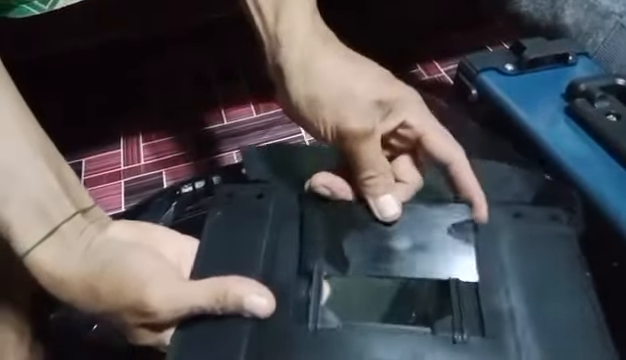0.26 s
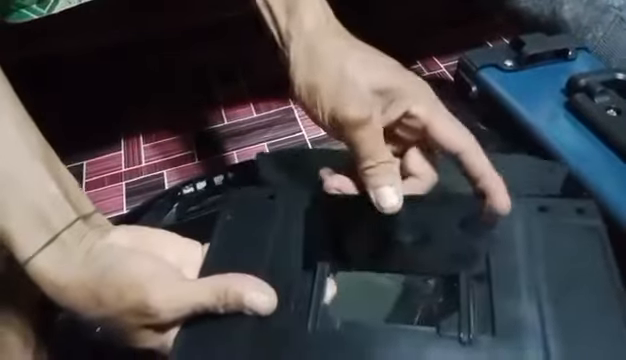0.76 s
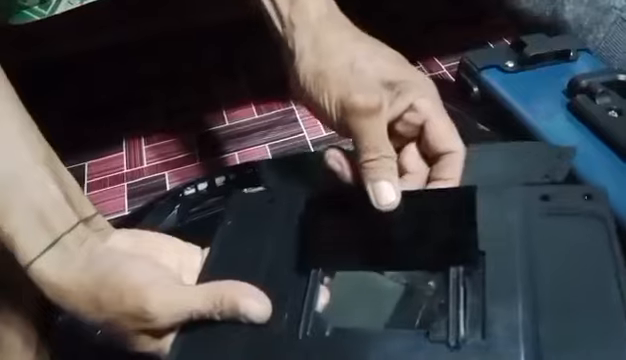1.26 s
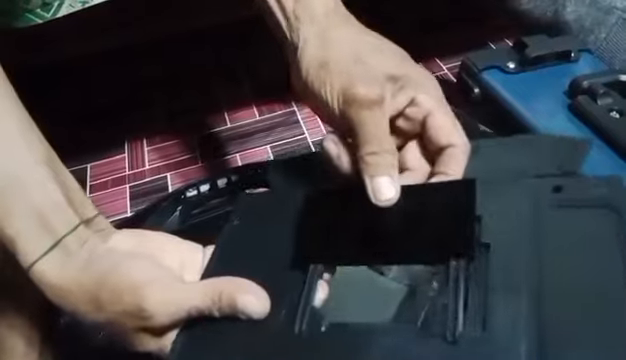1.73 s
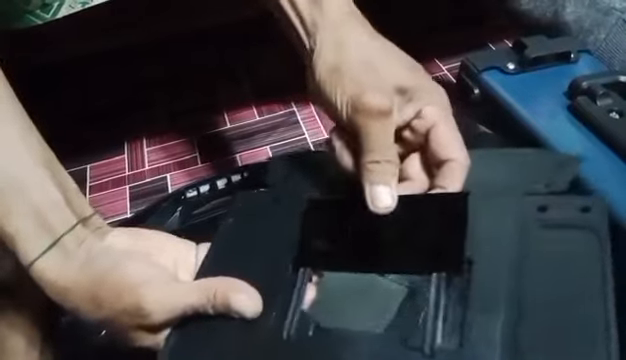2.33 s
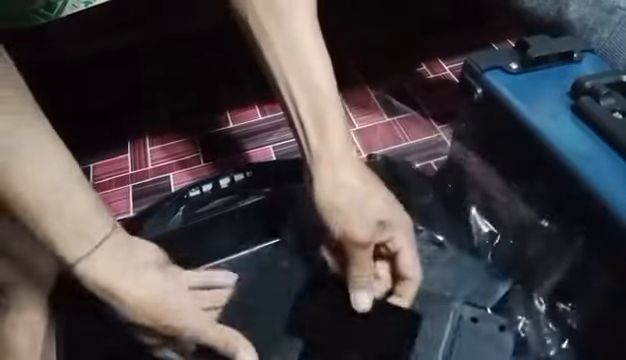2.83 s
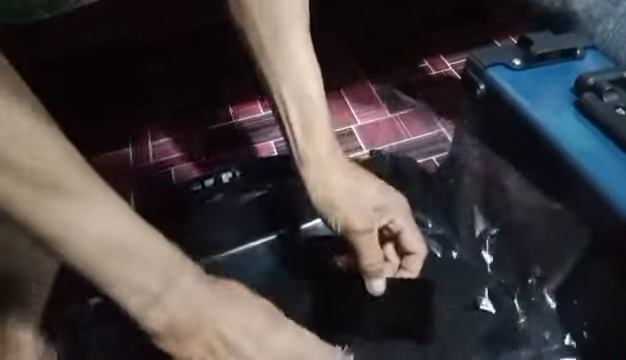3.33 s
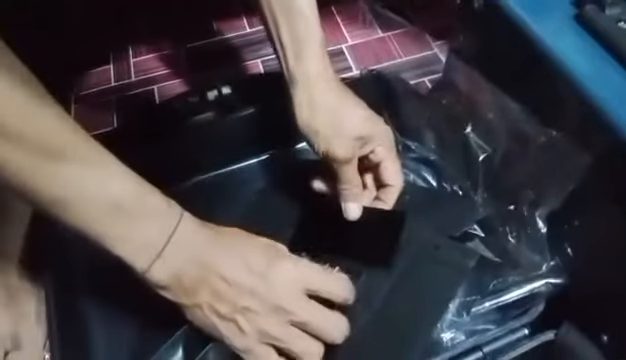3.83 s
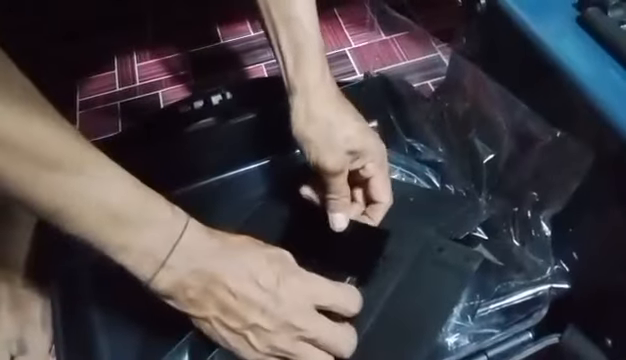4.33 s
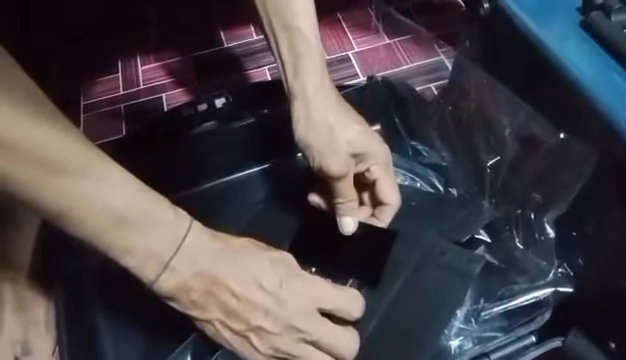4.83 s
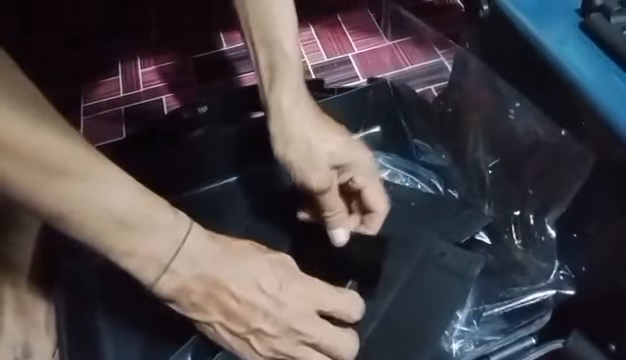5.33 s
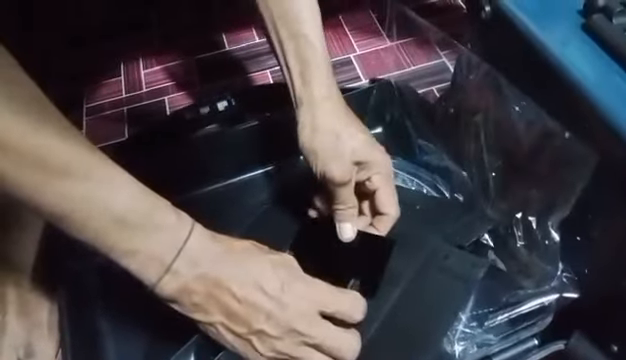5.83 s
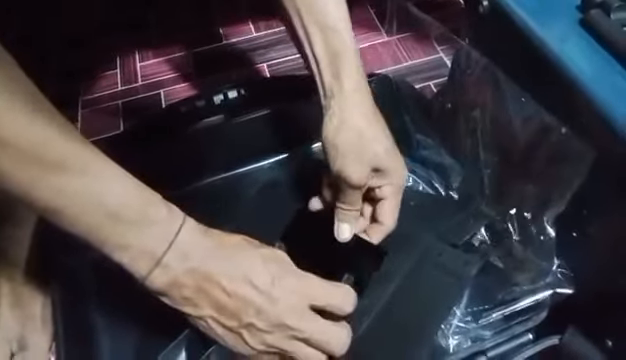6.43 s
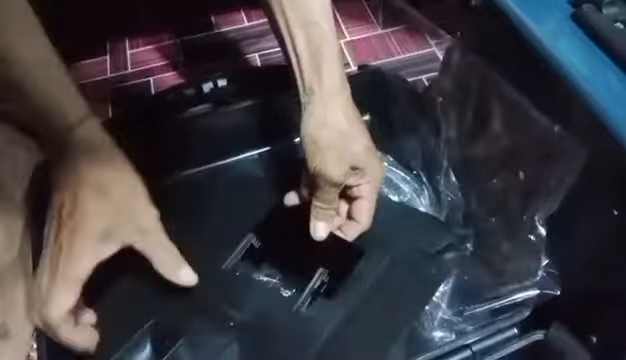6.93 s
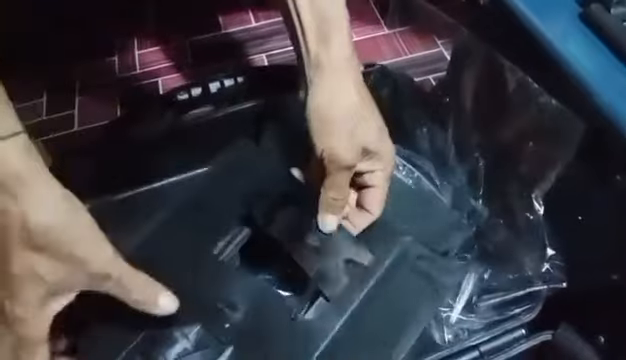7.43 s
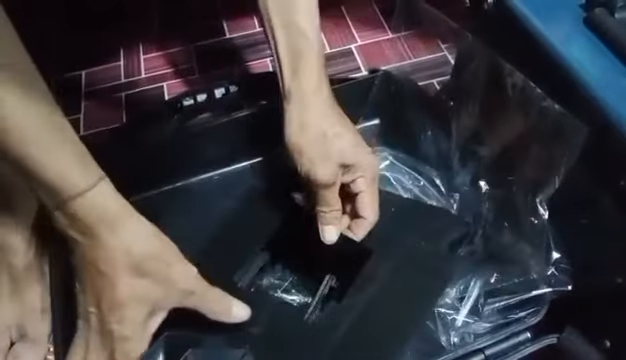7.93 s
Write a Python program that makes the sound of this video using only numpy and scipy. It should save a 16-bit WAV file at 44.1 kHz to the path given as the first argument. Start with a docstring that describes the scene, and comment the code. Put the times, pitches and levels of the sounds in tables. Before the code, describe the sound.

Close, detailed handling of plastic in a small room with a short diffuse echo, faint steady hiss and distant wavering low rumble. From 0 to 0.9 s, light film crinkles and a few brittle snaps. Sharp, bright clicks at about 1.2 and 2.2 s stand apart in near quiet, with a weaker one at 2.0. At 2.55-3.35 s the shell is moved: a dense flurry of crackling wrap, a heavy hollow clunk near 2.6, short scraping, and more snaps around 3.25. From 3.5 to 6.3 s the film settles in soft fine crackle, while small parts click and knock hollowly, clearest at 4.45, 4.85, 5.2 and 5.3. Around 6.4-6.7 s comes another crisp crinkling burst with strong snaps. A hollow knock, brief drag and faint rising creak follow near 7.0-7.2, another faint creak at 7.4, light knocks at 7.6-7.7, then a small rustle at 8.1.

```python
"""A small room: hands fit a glass filter into a plastic face shield that lies on clear wrapping, heard close up.
The film crinkles from filtered random clicks and snaps in short noise bursts.
The shell is knocked (decaying modes), dragged (slips through resonances) and creaks (gliding tones).
A short diffuse echo follows the hits; a faint hiss and a distant rumble of filtered noise fill the room."""
import sys
import numpy as np
from scipy import signal
from scipy.fft import rfft, irfft
from scipy.io import wavfile
from scipy.ndimage import uniform_filter1d

SR = 44100
rng = np.random.default_rng(int(sys.argv[2]) if len(sys.argv) > 2 else 0)


def output_pcm(signal):
    """Save a mono or channel-first signal as 16-bit PCM at the path in sys.argv[1].

    Samples are clipped to [-1, 1] before scaling.
    """
    pcm = np.clip(np.atleast_2d(signal).T, -1, 1) * 32767
    wavfile.write(sys.argv[1], SR, np.round(pcm).astype(np.int16))


N = 359856  # length in samples


def undb(db):
    """Amplitude factor of a level in dB."""
    return 10 ** (np.asarray(db) / 20)


def unit(x):
    """Scale to an RMS of 1."""
    return x / np.sqrt(np.mean(x ** 2))


def peak_unit(x):
    """Scale to a peak of 1."""
    return x / np.abs(x).max()


def curve(rows):
    """Columns of a breakpoint table, joined by straight lines sample by sample."""
    s, *columns = np.transpose(rows)
    return [np.interp(np.arange(N) / SR, s, c) for c in columns]


def colour(x, points, size=2048):
    """Causal minimum-phase filter through (f/Hz, gain/dB) points, made from the cepstrum."""
    hz, db = np.transpose(points)
    grid = np.maximum(np.fft.rfftfreq(size, 1 / SR), 1)
    log_gain = np.log(undb(np.interp(np.log(grid), np.log(hz), db)))
    cepstrum = irfft(log_gain)
    cepstrum[1:size // 2] *= 2  # fold onto positive time: no pre-ringing
    impulse = irfft(np.exp(rfft(cepstrum[:size // 2], size)))
    return signal.fftconvolve(x, impulse)[:len(x)]


def resonate(x, peaks):
    """Sum of band-passes (f/Hz, width/Hz, level/dB)."""
    return sum(undb(db) * signal.lfilter(*signal.iirpeak(hz, hz / width, SR), x) for hz, width, db in peaks)


def resonate_twice(x, peaks):
    """The same resonances in series, for steeper skirts."""
    return resonate(resonate(x, peaks), peaks)


def treble(x, hz):
    """Keep what lies above hz."""
    return signal.sosfilt(signal.butter(4, hz, "high", fs=SR, output="sos"), x)


def below(x, hz):
    """Keep what lies below hz."""
    return signal.sosfilt(signal.butter(4, hz, fs=SR, output="sos"), x)


def walk(rate):
    """Random values, a new one every 1 / rate s, joined by straight slopes."""
    k = int(SR / rate)
    return uniform_filter1d(np.repeat(rng.standard_normal(N // k + 1), k), k)[:N]


def grains(rate, spread_db):
    """Random clicks, about rate a second, most small and a few large."""
    happens, sign, size = rng.random((3, N))
    strength = undb(spread_db * np.minimum(-np.log(1 - size), 5))
    return (happens < rate / SR) * np.sign(sign - .5) * strength


def add(track, s, sound):
    """Mix a sound into the track at s seconds."""
    i = int(s * SR)
    track[i:i + len(sound)] += sound[:len(track) - i]


RISE_DB = 50  # climb of a push over its rise time


def swell(s, rise, hold, fall_db_s):
    """Gain that rises to 1 at s, holds and dies away, in straight dB slopes."""
    t = np.arange(N) / SR
    db = -RISE_DB * np.maximum(s - t, 0) / max(rise, .002) - fall_db_s * np.maximum(t - s - hold, 0)
    return undb(np.maximum(db, -200))


# moments when the level dips briefly: from t/s, to t/s
DIPS = [(2.614, 2.626), (2.931, 2.944)]


def dips():
    """1, but 0 in the brief dips, with softened edges."""
    t = np.arange(N) / SR
    return uniform_filter1d(1. - sum((t > a) & (t < b) for a, b in DIPS), size=128)


# tone of the film: f/Hz, gain/dB
FILM = [(1060, 0.5), (2000, -5), (2420, -3), (2980, -5), (4200, -0.5), (4700, 6), (6070, 8), (9260, 0),
        (13000, -6.5)]


def film_voice(x):
    """The film's tone colour, split into a dull part and a thin bright part."""
    full = treble(colour(x, FILM), 1480)
    return below(full, 8500), treble(full, 11640)


# bands of the rubbing film that come and go: f/Hz
SHEEN_HZ = [4900, 5600, 6440, 6960]
# larger folds of the film that ring in patches: f/Hz
FOLDS_HZ = [1390, 1800, 2400, 3310, 3750]
# slow settling of the film under the shell's weight: t/s, relative level/dB
SETTLE = [(0, -42), (1.0, -51.5), (2.5, -45), (3.75, -41), (4.42, -37.5), (5.5, -37.5), (6.35, -47),
          (6.9, -48.5), (7.2, -43), (7.86, -48), (8.16, -41)]
SETTLE_CRISP_DB = -14.5  # crisp share while settling
# bursts of crinkling as the film is pushed:
# t/s of full level, rise/s, hold/s, relative level/dB, crisp share/dB
RUSTLES = [(0.008, 0.039, 0.0059, -37, 2), (0.147, 0.086, 0.27, -43.5, -3.5), (0.58, 0.21, 0.026, -32, 0.5),
           (0.676, 0.07, 0.11, -43, -14), (0.877, 0.04, 0.015, -40, -12.5), (2.551, 0.057, 0.071, -28.5, 1),
           (2.626, 0.03, 0.15, -30.5, -4.5), (2.798, 0.12, 0.064, -36, -5), (2.888, 0.08, 0.023, -30.5, -6),
           (2.937, 0.067, 0.4, -38, -10), (3.308, 0.03, 0.031, -34, -3), (3.51, 0.077, 0.034, -38, -1),
           (6.442, 0.14, 0.032, -28.5, -3), (6.512, 0.065, 0.055, -32.5, -3),
           (6.673, 0.027, .005, -36.5, -8), (6.711, 0.025, 0.015, -33, -5.5), (6.95, 0.22, 0.22, -46, -6),
           (7.182, 0.028, 0.031, -35, -13), (8.098, 0.013, 0.07, -48.5, -6)]
RUSTLE_FALL_DB_S = 249


def crinkle():
    """Dull rubbing plus swarms of sharper buckles that come in bunches; when pushed, larger folds ring in patches."""
    rub, _ = film_voice(grains(6000, 1.8) * undb(1.8 * walk(75)))
    sheen = sum(undb(7 * np.tanh(walk(16))) * resonate(rub, [(hz, 450, 0)]) for hz in SHEEN_HZ)
    rub = unit(rub) + unit(sheen)

    buckles = grains(1000, 2.2) * undb(3.5 * walk(200))
    dull, bright = film_voice(buckles)
    crisp = undb(-16.0) * unit(dull) + unit(bright)
    folds = sum(undb(10 * np.tanh(walk(10))) * resonate_twice(buckles, [(hz, 260, 0)]) for hz in FOLDS_HZ)

    settle_gain = undb(curve(SETTLE)[0])
    crisp_gain = settle_gain * undb(SETTLE_CRISP_DB)
    push_gain = np.zeros(N)
    jerks = undb(4.5 * np.tanh(walk(90)))  # pushed film moves in fits
    for s, rise, hold, db, crisp_db in RUSTLES:
        burst = undb(db) * jerks * swell(s, rise, hold, RUSTLE_FALL_DB_S)
        push_gain = push_gain + burst
        crisp_gain = crisp_gain + undb(crisp_db) * burst
    rubbing = (settle_gain + push_gain) * undb(-4.0) * unit(rub)
    return rubbing + push_gain * undb(-15) * unit(folds) + crisp_gain * crisp


# single creases that snap: t/s, relative level/dB, relative thin bright share/dB
SNAPS = [(0.007, -27, -8), (0.02, -28, -7), (0.157, -21, 2), (0.19, -11.5, 3.5), (0.236, -18, 1),
         (0.3853, -12, 1), (0.517, -23, -1), (0.576, -21.5, 14), (2.539, -25, 5), (2.5874, -5, -3),
         (2.625, -8, 2), (2.708, -11, -15), (2.742, -8, -8), (2.7458, -7.5, -8), (2.7664, -18, 2),
         (2.783, -9, -24), (2.814, -17, -9), (2.858, -13, 0.5), (2.8843, -17, -8), (2.894, -16, -6),
         (2.904, -12, -1), (2.945, -19, 6), (3.072, -16.5, 2), (3.108, -20, -1), (3.217, -27, 14),
         (3.234, -15, 5), (3.252, -6, -10), (3.26, -10, -2), (3.301, -17, 10), (3.306, -16, -3),
         (3.313, -14, -1), (3.323, -10.5, 0), (3.333, -18, 0), (3.8644, -16, 3.5), (3.915, -16, 6),
         (4.807, -8, 1.5), (5.612, -17.5, -5), (6.0436, -19.5, 10.5), (6.363, -19.5, -3),
         (6.4122, -10, 4.5), (6.45, -8.5, -8), (6.46, -4, -9), (6.466, -4, -3), (6.522, -19, 2),
         (6.532, -16, -1), (6.558, -16, -2), (6.5689, -6.5, 1.5), (6.682, -18.5, -11), (6.983, -18, -3),
         (7.114, -15, -30), (7.333, -17.5, -0.5)]
SNAP_S, SNAP_SHORTENS = 0.0011, 0.25  # base decay of a crease; dB shorter per dB of bright share


def snaps():
    """Each crease lets go in a burst of a few milliseconds with a ring of its own; bright ones are the shortest."""
    out, t = np.zeros(N), np.arange(1024) / SR
    for s, db, bright_db in SNAPS:
        u = t / (SNAP_S * undb(-SNAP_SHORTENS * max(bright_db, -6)))
        dull, bright = film_voice(rng.standard_normal(len(t)) * u * np.exp(-u))
        dull = treble(dull, 2500) + resonate(dull, [(rng.choice(SHEEN_HZ), 500, 4.0)])
        crease = peak_unit(dull) + undb(bright_db + 4.0) * peak_unit(bright)
        add(out, s, undb(db - 8.0) * crease)
    return out


def ring(modes, push_s):
    """Modes (f/Hz, level/dB, t60/s) driven by a soft push of push_s, a little different each time; peak 1."""
    t, y = np.arange(3072) / SR, 0
    push = np.sin(np.pi * t[t < push_s] / push_s) ** 2
    for (hz, db, t60), (db_drift, hz_drift, phase) in zip(modes, rng.standard_normal((len(modes), 3))):
        decay = np.convolve(1000 ** (-t / t60), push)[:len(t)]
        mode = np.sin(2 * np.pi * (hz * (1 + .01 * hz_drift) * t + phase)) * decay
        y = y + undb(db + db_drift) * peak_unit(mode)
    return peak_unit(y)


# knocks on glass and shell, levels relative within each column:
# t/s, click level/dB, hollow ring level/dB, hollow pitch f/Hz, thud level/dB, side modes level/dB
KNOCKS = [(0.2108, -24, -33.5, 1270, -33.5, -11), (1.2136, -5, -24, 1346, -39, -9),
          (1.9813, -24.5, -48, 1430, -35, -17), (2.1961, -6.5, -41, 1330, -43, -8),
          (2.5996, -18.5, -35.5, 1460, -34, 5.5), (2.631, -8, -16, 1010, -12.5, -6),
          (2.712, -34, -28.5, 1010, -38, 6), (2.783, -26, -38, 706, -40, 0),
          (4.0185, -45, -29.5, 990, -35.5, -21), (4.286, -42, -28.5, 1107, -39, -11),
          (4.4567, -8, -11, 1092, -57, -16.5), (4.687, -31, -40.5, 953, -46, -2),
          (4.8605, -2.5, -15.5, 1007, -48, -7), (5.1831, -12.5, -18.5, 1040, -37, -3.5),
          (5.1867, -33, -28.5, 940, -44, -2), (5.2944, -9, -38.5, 1006, -47, 5),
          (6.138, -30, -31.5, 1070, -54, -15), (6.473, -18, -30, 1108, -58, 4),
          (6.705, -31, -30.5, 1356, -62, -1), (7.1768, -10, -15.5, 1048, -23.5, -14.5),
          (7.411, -52, -32, 780, -62, -7.5), (7.602, -18, -29, 1397, -41, -7.5),
          (7.6914, -12.5, -17.5, 1166, -54, -7.5)]
# bright modes of the click: f/Hz, level/dB, t60/s
CLICK = [(4800, -12, .006), (5350, -9, .008), (5950, -5, .01), (6690, 0, .018), (7400, -10, .006)]
# ring of the panel: f/Hz, level/dB, t60/s
PANEL = [(3297, -12, 0.021), (3580, -11, 0.0048)]
PANEL_DB = -12.5  # panel ring against the click
# modes beside the hollow pitch: multiple of the pitch, level/dB, t60/s
SIDE_MODES = [(0.682, -9, 0.058), (0.885, -1.5, 0.036), (1.142, -1, 0.011), (1.48, -2.5, 0.02),
              (1.7, -2.5, 0.0044), (2.3, -7, 0.013)]
HOLLOW_T60_S = 0.016
# low modes of the thud: f/Hz, level/dB, t60/s
THUD = [(400.6, -1.5, 0.16), (433, 4, 0.095), (535, 1.5, 0.071)]
# hollow of the shell, also rung by the drags: f/Hz, width/Hz, level/dB
SHELL_HOLLOW = [(730, 200, 4), (1060, 225, 10), (1367, 310, 9), (2540, 4700, 7.5)]
RATTLE_DB, RATTLE_T60_S = 5, 0.16  # buzz of loose parts against hollow plus side-mode level


def knocks():
    """A faint lead-in of noise, a short crack, four groups of modes (the hollow swells slowest) and a buzz.

    The grip sets the hollow pitch; the buzz of loose parts grows with the side modes."""
    out, t, after = np.zeros(N), np.arange(3072) / SR, np.arange(8192) / SR
    for s, click_db, hollow_db, hz, thud_db, side_db in KNOCKS:
        soft = .25 if thud_db > -20 else 1  # a heavy landing is abrupt
        crack = sum(film_voice(rng.standard_normal(len(t)) * t * np.exp(-t / 0.0011)))
        hollow = [(hz, 0, HOLLOW_T60_S)] + [(hz * k, db + side_db, t60) for k, db, t60 in SIDE_MODES]

        rattle = resonate_twice(rng.standard_normal(len(after)) ** 3, SHELL_HOLLOW)
        rattle *= np.minimum(after / 0.0092, 1) * 1000 ** (-after / RATTLE_T60_S)
        add(out, s, undb(hollow_db + side_db + RATTLE_DB) * peak_unit(rattle))

        # faint noise leads in for a few milliseconds before the knock
        lead_in = sum(film_voice(rng.standard_normal(len(t)) * (t < .007)))
        add(out, s - .008, undb(hollow_db - 11) * peak_unit(lead_in))

        hit = undb(click_db) * (ring(CLICK, 0.0026 * soft) + undb(-1.5) * peak_unit(crack))
        hit += undb(click_db + PANEL_DB) * ring(PANEL, 0.0028)
        hit += undb(hollow_db + 5.0) * ring(hollow, 0.0083 * soft)
        hit += undb(thud_db - 7.5) * ring(THUD, 0.0027)
        add(out, s - .002 * soft, hit)
    return out


# low body of the shell: f/Hz, width/Hz, level/dB
SHELL_LOW = [(278, 190, 2), (408, 67, 6), (621, 29, 5)]
# shell dragged over its bed: t/s of full level, rise/s, hold/s, low body level/dB, hollow level/dB
DRAGS = [(2.6, 0.026, 0.0046, -31.5, -39), (2.638, .01, 0.014, -33, -50), (2.655, 0.051, 0.043, -40.5, -36),
         (2.782, 0.02, 0.038, -48, -39), (3.065, 1, 0.25, -67.5, -50), (5.192, .01, 0.034, -69, -34),
         (6.435, 0.016, 0.0088, -46.5, -49), (6.487, 0.22, 0.0065, -68, -36),
         (6.697, 0.083, 0.017, -60, -38.5), (6.984, .02, 0.016, -53, -45), (7.2, .01, 0.028, -51, -40)]
DRAG_FALL_DB_S = 310


def drag():
    """Uneven slips of the rim ring the shell's low body and its hollow."""
    slips = below(grains(4000, 2) * undb(2 * walk(50)), 2500)
    low = unit(resonate_twice(slips, SHELL_LOW))
    hollow = unit(resonate_twice(slips, SHELL_HOLLOW))
    return sum(swell(s, rise, hold, DRAG_FALL_DB_S) * (undb(low_db) * low + undb(hollow_db) * hollow)
               for s, rise, hold, low_db, hollow_db in DRAGS)


# the rim creaks as it slides, its pitch rising:
# t/s, length/s, from f/Hz, to f/Hz (both before the waver), relative level/dB
CREAKS = [(6.979, 0.067, 472, 571, -45.5), (7.42, 0.117, 484, 624, -50.5)]


def creaks():
    """Quick stick-slip: a hoarse, uneven tone that glides up."""
    out, waver, lumps = np.zeros(N), walk(60), walk(70)
    for s, length, from_hz, to_hz, db in CREAKS:
        u = np.linspace(0, 1, int(length * SR))
        at = slice(int(s * SR), int(s * SR) + len(u))
        hz = (from_hz + (to_hz - from_hz) * u) * (1 + 0.064 * waver[at])
        tone = np.sin(2 * np.pi * np.cumsum(hz) / SR)
        fade = np.abs(np.sin(np.pi * u)) ** .5
        add(out, s, undb(db) * (1 + lumps[at]) * fade * tone)
    return out


# diffuse tail of the room by band: f/Hz, level/dB, t60/s
ECHO = [(670, -6, 0.18), (1460, -4, 0.14), (3550, -16, 0.27), (6260, -6.5, 0.21)]
ECHO_DB = -19.


def echo(x):
    """Diffuse tail of the room: bands of noise, each dying at its own rate."""
    t = np.arange(SR // 3) / SR
    tail = sum(resonate(rng.standard_normal(len(t)), [(hz, hz, db)]) * 1000 ** (-t / t60)
               for hz, db, t60 in ECHO)
    tail *= np.clip(t / 0.015, 0, 1)
    return undb(ECHO_DB) * signal.fftconvolve(x, tail / np.sqrt(np.sum(tail ** 2)))[:N]


# tone of the hiss: f/Hz, gain/dB
HISS = [(88, -28.5), (150, -2.5), (288, -7), (460, -4.5), (761, -5.5), (1210, -5.5), (1360, 5),
        (2090, -8.5), (4090, -23), (5210, -5), (6520, 3), (8620, -13.5), (13000, -17.5)]
HISS_DB = -49
# distant low rumble, before its waver; the low end swells briefly at 2.61 s as the shell lands: t/s, level/dB
RUMBLE = [(0.0, -66.5), (2.5, -64.5), (2.61, -47), (3.0, -67), (3.27, -57), (4.04, -57.5), (4.27, -66),
          (4.91, -55.5), (5.36, -44), (5.7, -59.5), (7.8, -65.5), (8.14, -55)]
# lowest modes of the room: f/Hz, width/Hz, level/dB
ROOM_BOOM = [(55, 32, -9), (91, 28.5, -6), (124, 8.7, -3), (184, 78, -12)]


def background():
    """Smooth hiss, and a wavering rumble that rings the room's lowest modes."""
    hiss = undb(HISS_DB) * unit(colour(rng.standard_normal(N), HISS))
    boom = sum(undb(3.7 * walk(16)) * resonate_twice(rng.standard_normal(N), [mode]) for mode in ROOM_BOOM)
    return hiss + undb(curve(RUMBLE)[0] + 5.6 * walk(5.9)) * unit(boom)


def scene():
    """Film and shell sounds with the room around them, the same in both channels."""
    level = dips()
    hits = snaps() + knocks() + creaks() + level * drag()
    mono = hits + echo(hits) + level * crinkle() + background()
    return np.array([mono, mono])


# bands of treble that flicker between the sides: f/Hz, relative level/dB
FLICKER = [(6500, 2), (8500, 5), (11500, -7)]
WIDE_HZ, WIDE_DB = 5260, -8.5  # lower edge and gain of the side signal
TOP_HZ = 13000


def record(dry):
    """Bass stays in the middle while bands of treble flicker from side to side; peaks are rounded, the top is cut."""
    side = sum(walk(36) * resonate(dry[0], [(hz, hz / 3, db)]) for hz, db in FLICKER)
    side = undb(WIDE_DB) * treble(treble(side, WIDE_HZ), WIDE_HZ)
    stereo = np.tanh(dry) + np.array([side, -side])
    return signal.sosfilt(signal.ellip(10, .2, 75, TOP_HZ, fs=SR, output="sos"), stereo)


dry = scene()
out = record(dry)
output_pcm(out)
```